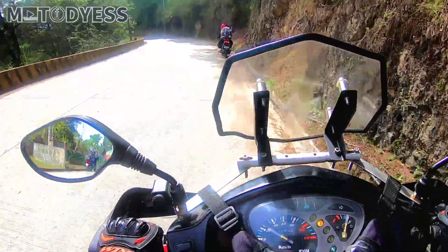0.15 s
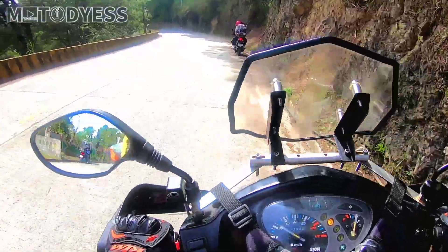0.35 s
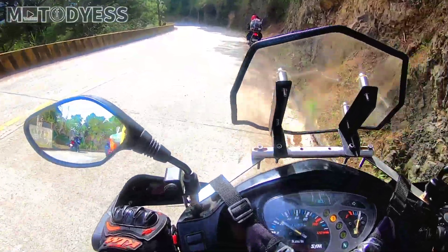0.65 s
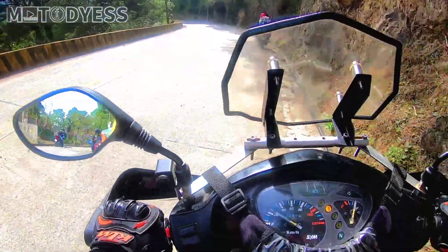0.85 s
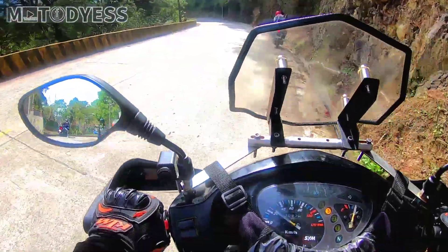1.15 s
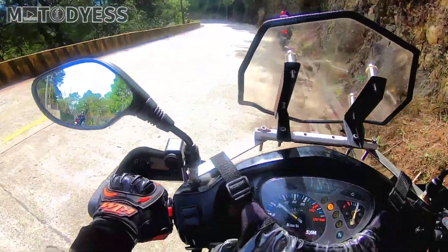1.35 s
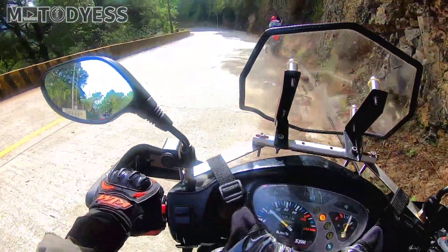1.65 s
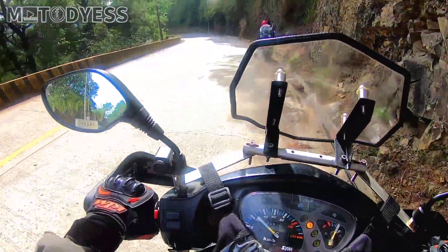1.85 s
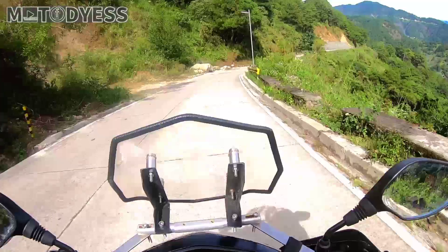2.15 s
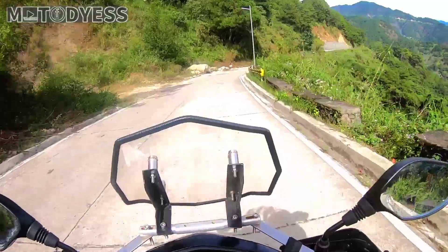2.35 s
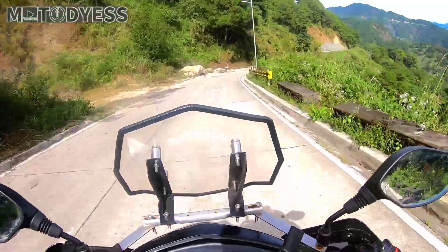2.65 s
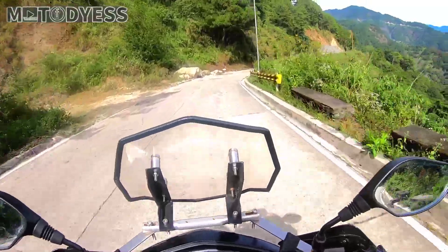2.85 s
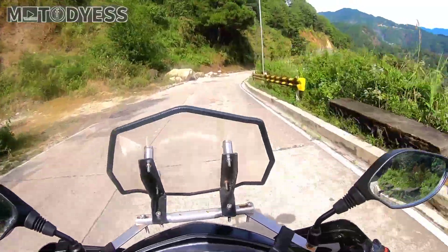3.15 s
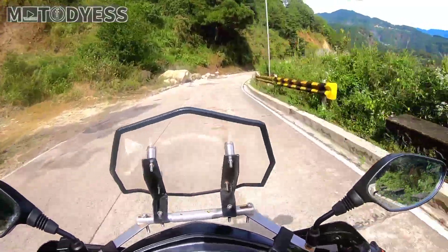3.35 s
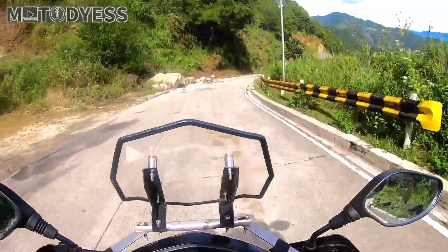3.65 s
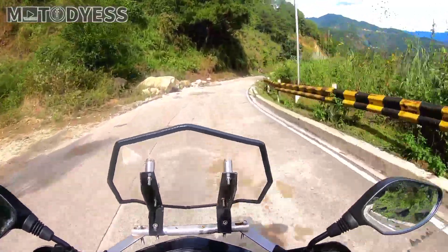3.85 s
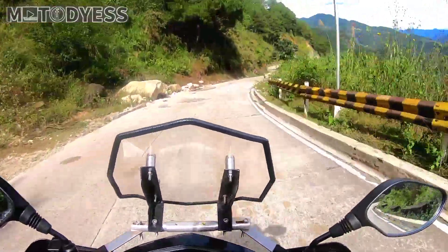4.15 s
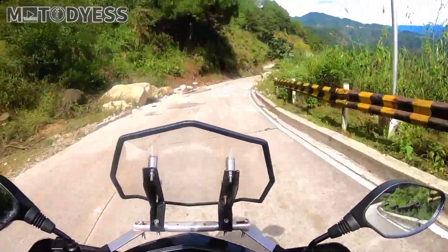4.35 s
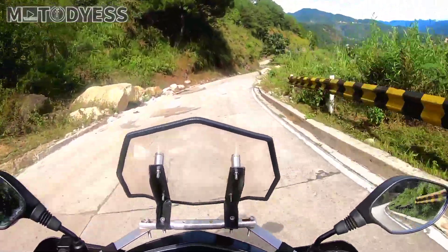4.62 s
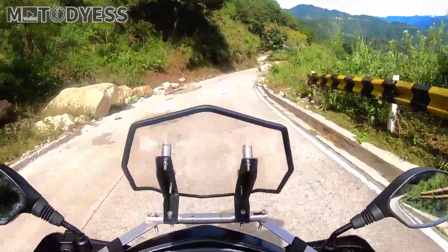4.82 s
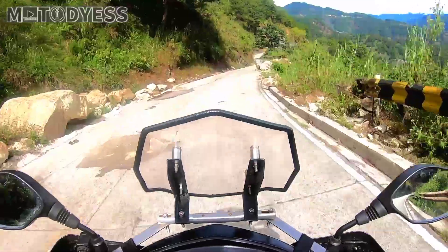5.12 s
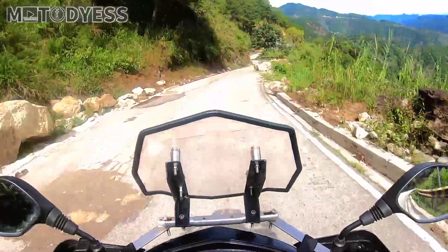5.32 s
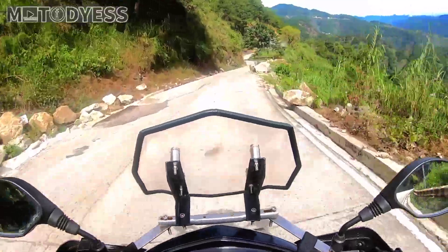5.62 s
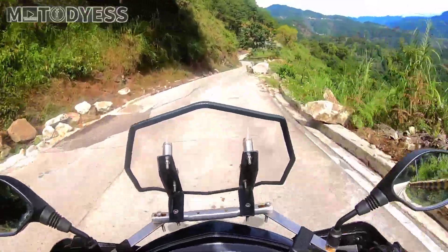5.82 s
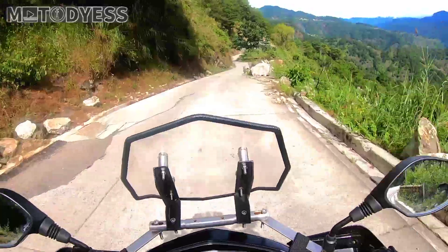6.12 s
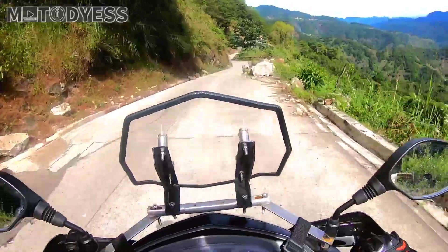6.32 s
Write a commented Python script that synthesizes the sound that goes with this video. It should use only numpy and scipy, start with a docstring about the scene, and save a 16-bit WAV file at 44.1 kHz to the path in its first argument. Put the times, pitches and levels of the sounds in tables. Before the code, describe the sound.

Heard from the rider's chest on a mountain road, a small single-cylinder motorcycle throbs slowly and unevenly, then steadies and climbs a little while wind rumbles on the microphone. Loose parts knock and clink lightly. About a third of the way in, the sound switches abruptly to a faster stretch with louder tyre roar, engine hiss and heavy wind. Hard slaps of air briefly overload the microphone until the end.

```python
"""A small single-cylinder bike on a mountain road, heard from the rider's chest. It starts with a slow,
uneven pull round a bend: firings throb in the exhaust, wind buffets the microphone, tyres roar on
concrete, and gas and engine parts hiss in step. Loose parts clink and tick, the ignition ticks faintly,
and the engine steadies and climbs. At 2.3 s a faster stretch begins at once, with louder road and hiss.
From there to the end, hard slaps of wind drive the microphone into overload."""
import sys
import numpy as np
from scipy import signal
from scipy.fft import rfft, irfft, next_fast_len
from scipy.io import wavfile
from scipy.ndimage import uniform_filter1d

SR = 44100
rng = np.random.default_rng(int(sys.argv[2]) if len(sys.argv) > 2 else 0)


def dump_mix(stems):
    """Bounce the given channels to the path in sys.argv[1] as a 16-bit WAV at rate SR."""
    frames = np.atleast_2d(stems).T  # one column per channel
    limited = np.clip(frames, -1, 1)  # hard clip at full scale
    pcm = np.round(limited * 32767).astype(np.int16)
    wavfile.write(sys.argv[1], SR, pcm)


N = 285812
TIME = np.arange(N) / SR


def gain(db):
    """Turn decibels into a number to multiply by."""
    return np.exp(np.asarray(db) * (np.log(10) / 20))


def unit(x):
    """Scale a signal to an average power of 1."""
    return x / np.sqrt(np.mean(x ** 2))


def wander(rate, stride=1):
    """Glide to a new random value `rate` times a second; give every stride-th sample."""
    steps = np.repeat(rng.standard_normal(int(N / SR * rate) + 3), 8)
    steps = uniform_filter1d(uniform_filter1d(steps, size=8), size=8)
    return np.interp(np.arange(0, N, stride) * (8 * rate / SR), np.arange(len(steps)), unit(steps))


def curve(table):
    """Join a table's points in time with straight lines."""
    return np.interp(TIME, *np.transpose(table))


def level_at(spectrum, hz):
    """Look up a spectrum's level in dB at any frequency."""
    f, db = np.transpose(spectrum)
    return np.interp(np.log(hz), np.log(f), db)


def resonate(x, hz, width_hz):
    """Let a signal ring around one frequency."""
    return signal.lfilter(*signal.iirpeak(hz, hz / width_hz, SR), x)


# How wind, road and hiss are coloured in the bend, against the fast stretch: f/Hz, level/dB
BEND_TINT = [(8, 1), (30, -3.5), (90, 5), (200, 7), (330, 5.5), (470, 4), (700, 0), (1000, -0.5),
             (1500, 2.5), (2000, 3.5), (2800, 0.5), (4800, 5.5), (7000, 5), (11000, 1)]

def shaped_noise(spectrum, swell_db, flicker_db, flicker_hz, in_bend=0.):
    """Noise in half-octave bands that swell together while each flickers on its own."""
    size = next_fast_len(N, True)
    hz = np.arange(1, size // 2 + 2) * SR / size
    low, high = spectrum[0][0], spectrum[-1][0]
    full = rfft(rng.standard_normal(size)) * gain(level_at(spectrum, hz)) * (hz > low) * (hz < high)
    out = 0
    for centre in np.arange(np.floor(2 * np.log2(low)), 2 * np.log2(high) + 1):
        share = np.cos(np.pi / 2 * np.clip(2 * np.log2(hz) - centre, -1, 1)) ** 2
        band_db = flicker_db * wander(flicker_hz) + in_bend * level_at(BEND_TINT, 2 ** (centre / 2))
        out = out + irfft(full * share, size)[:N] * gain(band_db)
    return unit(out * gain(swell_db))


# How often the exhaust puffs: t/s, f/Hz
PULSE_RATE = [(0, 24.5), (.1, 24.5), (.2, 25.8), (.35, 25.7), (.49, 24.7), (.6, 22.1), (.7, 23.6),
              (.83, 25.9), (1.09, 28.1), (1.4, 28.75), (1.55, 29.4), (1.75, 29.8), (2.27, 29.7),
              (2.33, 27.1), (3.1, 29), (3.6, 29.5), (4.41, 30), (4.8, 29.5), (5.65, 28.2), (6.1, 27.8),
              (6.48, 28)]
# How loud the exhaust is: t/s, level/dB
EXHAUST_LEVEL = [(0, -25), (.2, -17), (.3, -21), (.62, -21), (1.0, -20), (1.5, -20), (2.27, -23),
                 (2.33, -24.5), (3.1, -22), (4.4, -21), (5.1, -23), (5.5, -21.5), (6.48, -25.5)]
# How unevenly the engine runs: t/s, roughness/0-1
ROUGHNESS = [(0, .3), (.27, .3), (.4, .6), (.6, .6), (.76, .12), (2.3, .08), (2.4, .08), (6.48, .08)]
# The pipe's colour for tones at whole multiples of the pulse rate: f/Hz, level/dB
BEND_PIPE = [(29, -20), (59, -4), (88, -3), (118, -0.5), (147, -2.5), (176, 2.5), (206, -1.5), (222, -6.5),
             (234, -20.5), (248, -23), (290, -35), (328, -24), (354, -22.5), (385, -45), (420, -45)]
FAST_PIPE = [(29, -16), (58, -4.5), (87, -3.5), (106, 10.5), (122, 1), (146, -9.5), (175, -27), (205, -18),
             (240, -26), (350, -12), (420, -25)]
# The same for tones halfway between, made as strong and weak pulses take turns: f/Hz, level/dB
BEND_BETWEEN = [(44, -6.5), (73, 0.5), (103, -8), (132, -9.5), (160, -26), (190, -54)]
FAST_BETWEEN = [(44, -18), (73, -7), (103, -21), (132, -65), (190, -35)]

def exhaust(fast, phase, smear=0.2007, cutoff_hz=199, drone_hz=206):
    """Gas pulses make a stack of tones; the pipe colours and smears them, rough running shakes them."""
    stride = 16  # the tones are low, so every 16th sample is enough
    hz, level_db, rough = (curve(table)[::stride] for table in (PULSE_RATE, EXHAUST_LEVEL, ROUGHNESS))
    fast = fast[::stride]
    climb_hz_per_s = np.gradient(hz) * SR / stride
    bark_db = -3 + 12.5 * rough + 0.38 * (1 - fast) * climb_hz_per_s
    shaken = phase[::stride] + .12 * rough * wander(16, stride)
    out, power = 0, 0
    for k in [*range(1, 15), *np.arange(1.5, 7)]:
        bend_shape, fast_shape = (BEND_BETWEEN, FAST_BETWEEN) if k % 1 else (BEND_PIPE, FAST_PIPE)
        db = (1 - fast) * level_at(bend_shape, k * hz) + fast * level_at(fast_shape, k * hz)
        db += bark_db * np.clip(k * hz / cutoff_hz - 1, 0, .1) * 10  # only above the pipe's cut-off
        # Uneven pulses cannot build up the pipe's drone.
        db -= 16 * rough * np.exp(-(4 * np.log(k * hz / drone_hz)) ** 2)
        waver = rough * (2 if k % 1 or k < 6 else .7)  # low and halfway tones waver most
        size = gain(db + 4 * np.tanh(2 * waver) * np.tanh(wander(16, stride)))
        out = out + size * np.cos(k * shaken - smear * k * k + 1.3 * waver * wander(18, stride))
        power = power + gain(2 * db) / 2
    return signal.resample_poly(gain(level_db) * out / np.sqrt(power), stride, 1, padtype="line")[:N]


def throb(phase, pulse_db, cycle_db, twice_db, buzz_db, lag):
    """Gas and parts swell with each pulse, every two pulses, twice a pulse and with the frame's buzz."""
    return (pulse_db * np.cos(phase - lag) + cycle_db * np.cos((phase - lag) / 2)
            + twice_db * np.cos(2 * phase) + buzz_db * np.cos(4 * phase))


# The wind's deep rumble: f/Hz, level/dB
WIND_SPECTRUM = [(3, -5.5), (8, 1), (17, -2.5), (30, -7.5), (55, -15.5), (90, -22), (160, -31), (300, -43)]
# How strong the gusts are: t/s, level/dB
GUSTS = [(0, -18.5), (.2, -10), (.35, -15), (.75, -11), (1.15, -20.5), (1.4, -15.5), (1.7, -20.5),
         (1.85, -14), (2.05, -20.5), (2.28, -21), (2.33, -6), (2.8, -9), (4, -7), (5.3, -6), (6.25, -8.5),
         (6.48, -7)]

def wind(in_bend):
    """Air buffets the microphone; the biggest swings are gently squashed."""
    rumble = shaped_noise(WIND_SPECTRUM, 0., flicker_db=0.16, flicker_hz=11, in_bend=in_bend)
    return np.tanh(rumble * gain(curve(GUSTS)))


# Rough patches of road: t/s, length/s, road lift/dB, hiss lift/dB
BUMPS = [(0, 0.11, 1, 5.5), (0.147, 0.13, 2.5, 7), (3.94, 0.081, 1.5, 2), (4.337, 0.18, 1.5, -0.5),
         (5.361, 0.015, 5.5, 5.5), (5.84, 0.045, 1.5, 1.5), (6.304, .1, 0, 1)]

def bumps(rise_s=0.049, fall_s=0.065):
    """Each rough patch lifts the roar and the hiss for a moment; gives one dB curve for each."""
    return sum(np.outer(lift_db, np.interp(TIME, [s - rise_s, s, s + length, s + length + fall_s],
                                           [0, 1, 1, 0]))
               for s, length, *lift_db in BUMPS)


def chatter(per_second, size_db, fade_ms):
    """Random jolts lift the level at once, then let it fade."""
    jolts = (rng.random(N) < per_second / SR) * rng.random(N)
    return size_db * signal.lfilter([1], [1, -np.exp(-1000 / (fade_ms * SR))], jolts)


# The roar of the tyres: f/Hz, level/dB
TYRE_SPECTRUM = [(120, -36), (200, -10), (232, -8.5), (268, -1.5), (308, -4), (360, 0), (402, -2.5),
                 (497, 0), (560, -3.5), (650, -6), (731, -5), (860, -7), (972, -8.5), (1260, -16),
                 (1800, -21.5), (2340, -34), (3960, -120)]
# Ringing body panels: f/Hz, width/Hz, level/dB, extra in the bend/dB
PANELS = [(438.6, 26, -26, 16.5), (502, 65, -18.5, 3.5), (746, 64, -18, 6), (955, 53, -19, 0.5),
          (1160, 76, -43, 11)]

def tyres(swell_db, lift_db, in_bend, bend_db=-38.5, fast_db=-26.5):
    """Tyres roar on concrete, and the body panels ring along."""
    roar = shaped_noise(TYRE_SPECTRUM, swell_db, flicker_db=0.11, flicker_hz=16, in_bend=in_bend)
    panels = sum(gain(db + extra_db * in_bend + 2 * wander(9)) * unit(resonate(roar, hz, width))
                 for hz, width, db, extra_db in PANELS)
    return (roar + panels) * gain(in_bend * bend_db + (1 - in_bend) * fast_db + lift_db)


# The hiss of gas and engine parts: f/Hz, level/dB
HISS_SPECTRUM = [(1100, -37), (1500, -4.5), (1770, -4.5), (1870, -8), (2200, -2.5), (2550, -2), (2900, -5),
                 (3050, -4.5), (4000, -10), (4900, -12.5), (5600, -10.5), (6400, -9), (7000, -12.5),
                 (7600, -13), (9500, -22.5), (11400, -32), (14000, -39)]
# Whines of the engine casing: f/Hz, width/Hz, level/dB
WHINES = [(2055, 47, -14.5), (2750, 88, -12), (6210, 1060, -15)]
# How the whines rise and fall against the hiss: t/s, level/dB
WHINE_SWELL = [(0, -2.5), (2.3, -4), (2.9, 1.5), (3.6, -1), (4.0, -6), (4.3, 4.5), (4.42, 5), (5.4, 0),
               (6.48, -2)]

def engine_hiss(throb_db, jolt_db, lift_db, in_bend, bend_db=-54.5, fast_db=-43.5):
    """Gas and parts hiss, and the casing whines, in step with the firings."""
    hiss = shaped_noise(HISS_SPECTRUM, throb_db + jolt_db,
                        flicker_db=0.33, flicker_hz=21.87, in_bend=in_bend)
    for hz, width, db in WHINES:
        whine_db = db + throb_db + curve(WHINE_SWELL) + 0.93 * wander(4.5)
        whine = resonate(resonate(rng.standard_normal(N), hz, width), hz, width)
        hiss += gain(whine_db) * unit(whine)
    return hiss * gain(in_bend * bend_db + (1 - in_bend) * fast_db + lift_db)


# The notes of a loose metal bracket: f/Hz, level/dB, time to fade by 60 dB/ms
BRACKET_NOTES = [(2280, -2, 25), (3250, -3.5, 18), (3950, -7, 21), (4370, -5.5, 15), (4780, -9, 24),
                 (5540, -3, 12), (6000, -8, 19), (6550, -5, 22), (7400, -8, 17)]
# The clearest blows on it: t/s, level/dB, f/Hz struck hardest
CLINKS = [(.018, -38, 4900), (.04, -38, 3900), (.09, -41, 2300), (.128, -39, 2300), (.152, -42, 3000),
          (0.193, -32, 3200), (.23, -40, 3700), (.275, -40, 5000), (3.614, -40, 5900), (3.712, -36, 4600),
          (3.9, -42, 4400), (3.927, -46, 6100), (3.996, -40, 5200), (5.363, -26, 5000), (6.143, -56, 5000)]

def clinks(fast, per_second=30, scatter_db=7, reach_octaves=0.3):
    """Blows ring the bracket's notes near the pitch struck; small random blows add a jingle."""
    when, strength, pitch = rng.random((int(per_second * N / SR), 3)).T
    at = (when * N).astype(int)
    jingle_db = np.where(fast[at] > .5, -50.5, -60) - 2.5 * np.log(strength + 0.05)
    jingle = np.c_[at / SR, jingle_db, 5800 + 1300 * pitch]
    s, blow_db, struck_hz = np.vstack([CLINKS, jingle]).T
    luck_db = scatter_db * rng.standard_normal((len(s), len(BRACKET_NOTES)))
    out = 0
    for (hz, note_db, fade_ms), own_db in zip(BRACKET_NOTES, luck_db.T):
        miss_db = 6.8 * (np.log2(hz / struck_hz) / reach_octaves) ** 2
        blows = np.zeros(N)
        np.add.at(blows, (s * SR).astype(int), gain(blow_db + note_db + own_db - miss_db))
        pole = np.exp(2j * np.pi * hz / SR - np.log(1000) * 1000 / (fade_ms * SR))  # a fading tone
        out = out + signal.lfilter([1], [1, -pole], blows).imag
    return signal.sosfilt(signal.butter(4, 8500, fs=SR, output="sos"), out)  # soft blows lack top treble


def sparks(fast, bend_hz=27.95, first_s=.0215, swing_db=1.5):
    """The microphone's wiring picks up each ignition spark as a faint, very high tick."""
    hz = (1 - fast) * bend_hz + fast * 2 * curve(PULSE_RATE)
    fired = np.diff(np.floor(np.cumsum(hz) / SR - first_s * bend_hz), prepend=-1)
    strong_or_weak = (-1) ** np.cumsum(fired)
    size = gain(-37 + swing_db * fast * strong_or_weak + 1.5 * wander(30))
    return signal.sosfilt(signal.butter(4, 15300, "high", fs=SR, output="sos"), fired * size)


# Knocks of loose parts: t/s, peak level/dB, lowest f/Hz, highest f/Hz, time to fade by 60 dB/ms
TICKS = [(0.153, -16, 148, 780, 26), (0.191, -23, 150, 880, 8.6), (0.233, -39, 300, 2540, 18),
         (.400, -26.5, 4900, 6600, 5.5), (1.551, -16.5, 1690, 4020, 2.6), (3.994, -27, 1204, 2500, 65),
         (5.381, -26, 1200, 1690, 54)]

def ticks(contact_db=-31):
    """A loose part knocks: a dying burst of noise, mostly in that part's own range of pitch."""
    out, t = np.zeros(N), np.arange(SR // 8) / SR
    dull = signal.butter(4, 5500, fs=SR, output="sos")
    for s, db, low_hz, high_hz, fade_ms in TICKS:
        noise = rng.standard_normal(len(t)) * 1000 ** (-1000 * t / fade_ms)
        noise[0] = 8  # the sharp first contact
        band = signal.butter(4, [low_hz, high_hz], "band", fs=SR, output="sos")
        burst = signal.sosfilt(band, noise) + gain(contact_db) * signal.sosfilt(dull, noise)
        at = int(s * SR)
        out[at:at + len(t)] += gain(db) * burst / np.abs(burst).max()
    return out


# The hardest slaps of wind: t/s, push/full scale, length/ms
SLAPS = [(.43, -.7, 30), (2.424, .85, 20), (2.733, .85, 21), (3.105, .82, 23), (3.252, -1.1, 18),
         (3.676, .98, 16), (3.852, .85, 18), (4.38, .85, 11), (4.4, -.92, 16), (5.397, -1.1, 17),
         (5.56, .85, 18), (5.781, -.85, 24), (5.941, -.95, 19), (6.191, -1.14, 27)]

def with_slaps(buffeting):
    """A hard slap of air shoves the microphone's diaphragm and briefly replaces the buffeting."""
    push, takeover = 0, 0
    for s, size, ms in SLAPS:
        lump = np.exp(-np.log(16) * ((TIME - s) / (ms / 1000)) ** 2)
        push = push + size * lump
        takeover = np.maximum(takeover, lump)
    return push + (1 - takeover) * buffeting


# Brief, thin ringing tones: start t/s, end t/s, f/Hz, level/dB
THIN_RINGS = [(.975, 1.02, 3870, -53), (1.566, 1.6, 3870, -48)]

def thin_rings():
    """A faint pure tone swells and dies away."""
    out = 0
    for start, end, hz, db in THIN_RINGS:
        swell = np.sin(np.pi * np.clip((TIME - start) / (end - start), 0, 1))
        out = out + gain(db) * swell * np.sin(2 * np.pi * hz * TIME)
    return out


def scene(change_s=2.295, blend_s=0.058):
    """Add up all the sounds; the bend gives way to the fast stretch within a moment."""
    fast = np.clip((TIME - change_s) / blend_s + .5, 0, 1)
    in_bend = 1 - fast
    phase = 2 * np.pi * (np.cumsum(curve(PULSE_RATE)) / SR + 0.3017)  # one turn per exhaust pulse
    engine = exhaust(fast, phase)
    throb_db = in_bend * throb(phase, pulse_db=0.5, cycle_db=1, twice_db=1, buzz_db=0, lag=1.5)
    throb_db += fast * throb(phase, pulse_db=1.2, cycle_db=0, twice_db=0.97, buzz_db=2, lag=0.49)
    road_lift_db, hiss_lift_db = bumps()
    jolt_db = .5 * wander(24.94) + chatter(per_second=35, size_db=4, fade_ms=5)
    road = tyres(0.43 * throb_db + 0.85 * jolt_db, road_lift_db, in_bend)
    hiss = engine_hiss(throb_db, jolt_db, hiss_lift_db, in_bend)
    air = with_slaps(wind(in_bend))
    return (engine + air + road + hiss + ticks() + clinks(fast) + sparks(fast) + thin_rings())[None]


# The microphone's own faint hiss: f/Hz, level/dB
MIC_HISS = [(5000, -11), (9000, 1), (13500, -8.5), (15400, -3), (16500, -5)]

def record(dry, hardness=70, top_hz=15460):
    """The microphone adds its own hiss and overloads at full scale; the highest treble is cut."""
    noisy = dry + gain(-67.5) * shaped_noise(MIC_HISS, 0., flicker_db=2.5, flicker_hz=33)
    clipped = noisy / (1 + np.abs(noisy) ** hardness) ** (1 / hardness)
    treble_cut = signal.ellip(14, .1, 70, top_hz, fs=SR, output="sos")
    first = clipped[:, :1]  # filtering from the opening value avoids a click
    return first + signal.sosfilt(treble_cut, clipped - first)


dry = scene()
out = record(dry)
dump_mix(out)
```